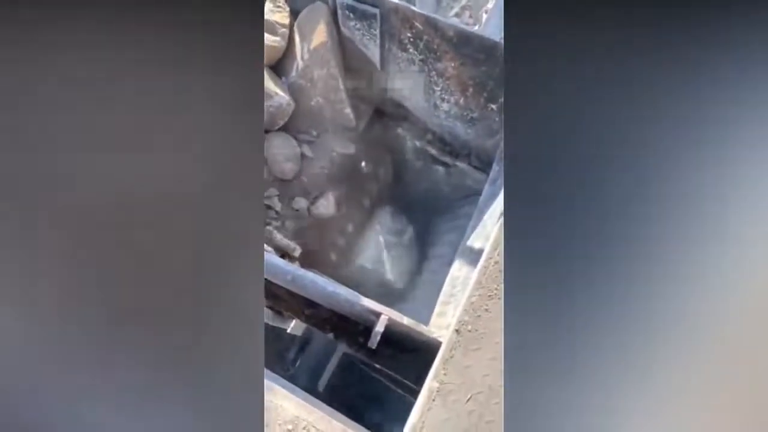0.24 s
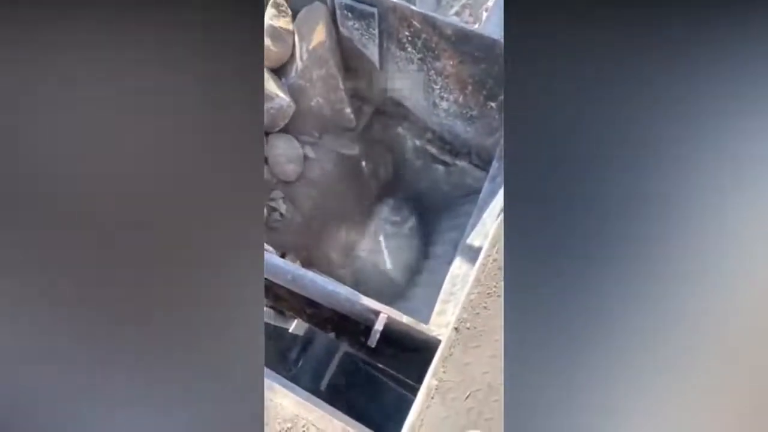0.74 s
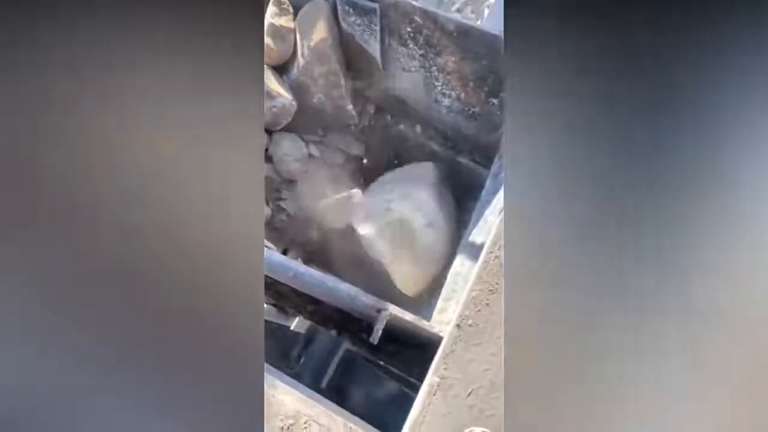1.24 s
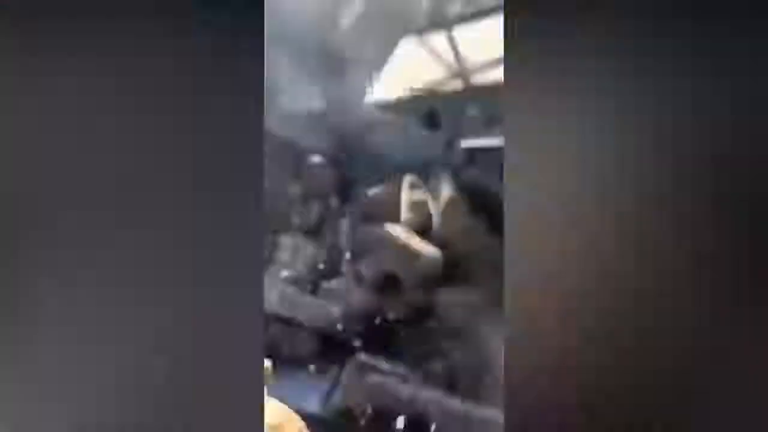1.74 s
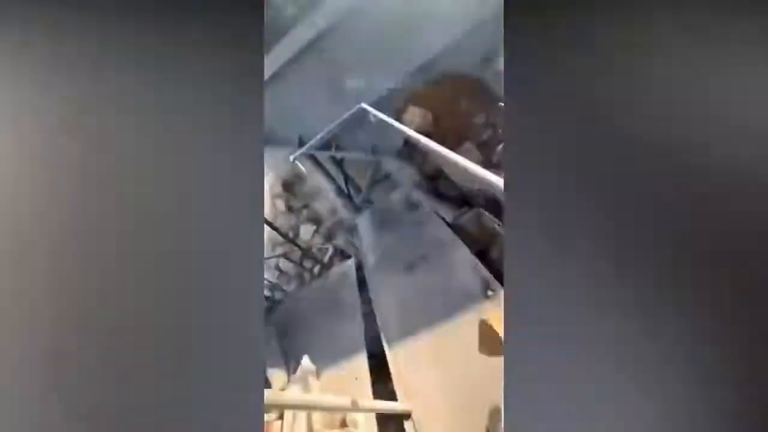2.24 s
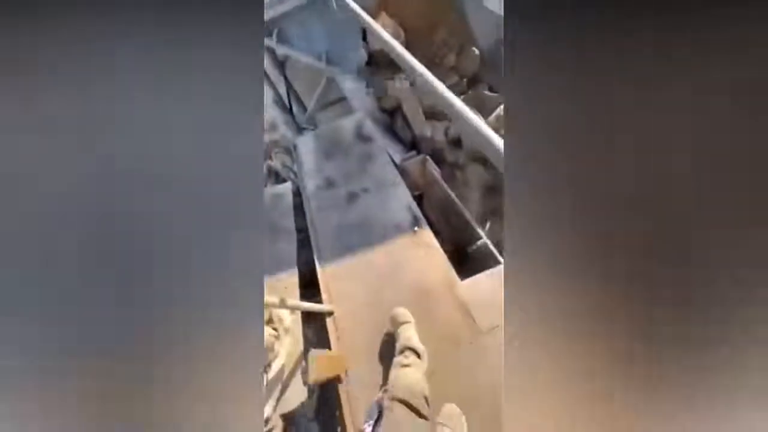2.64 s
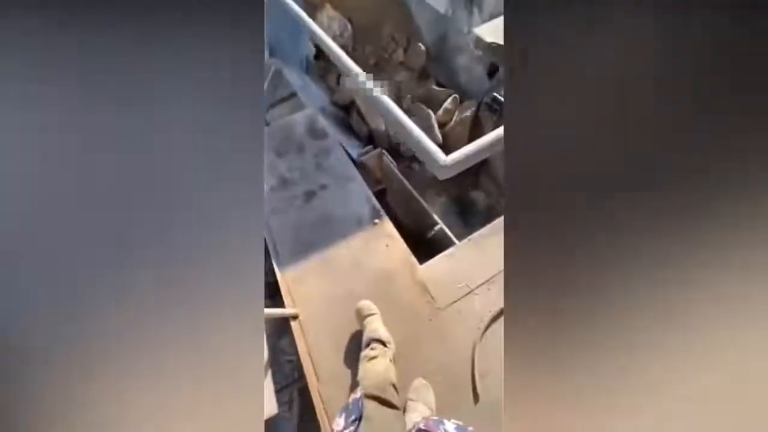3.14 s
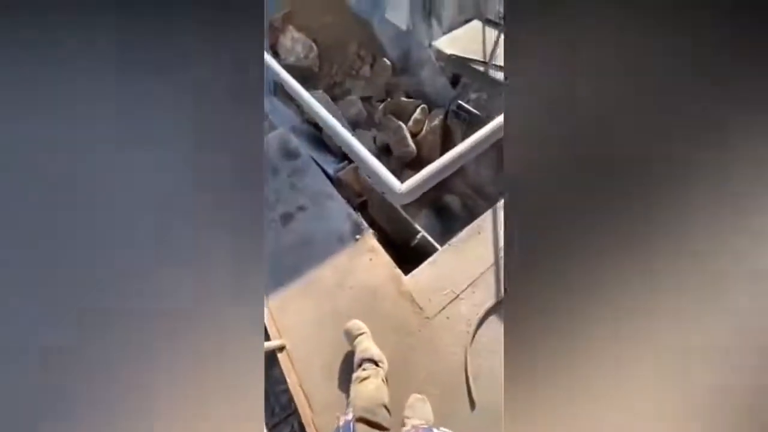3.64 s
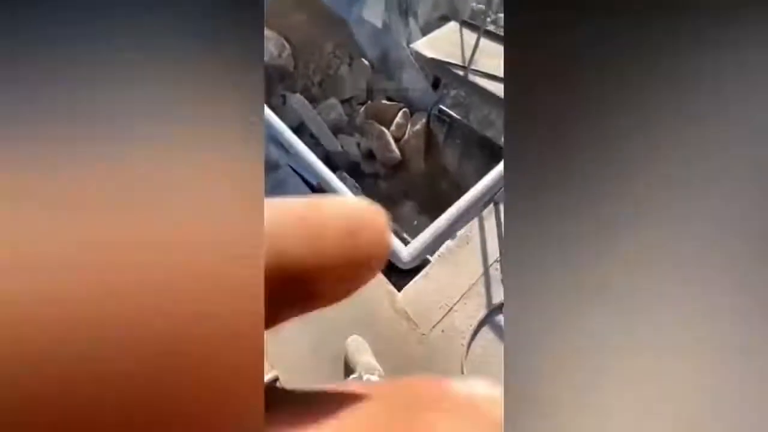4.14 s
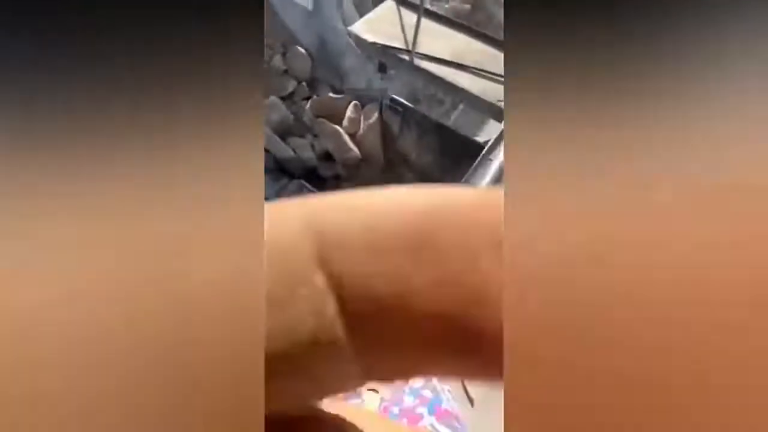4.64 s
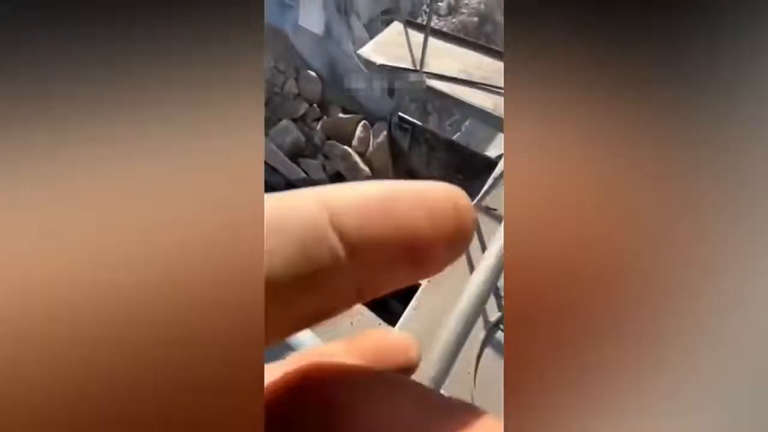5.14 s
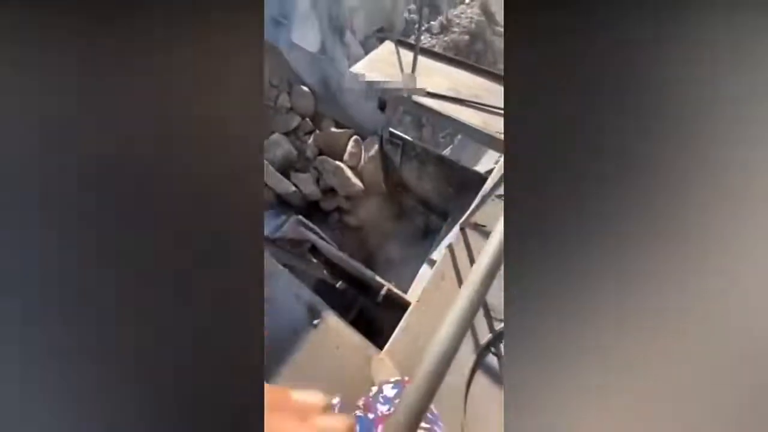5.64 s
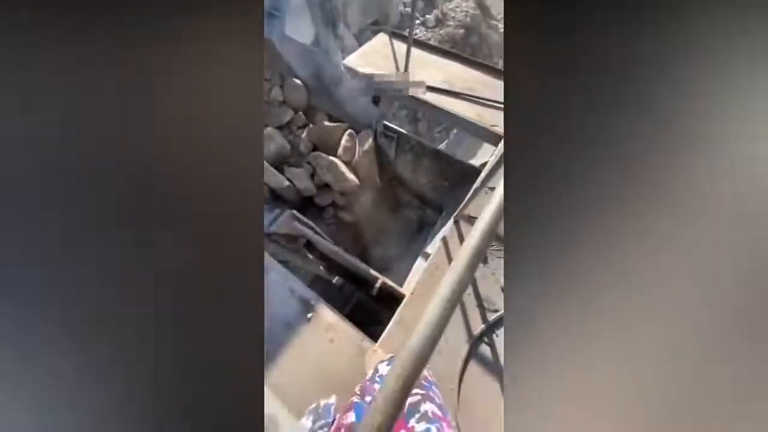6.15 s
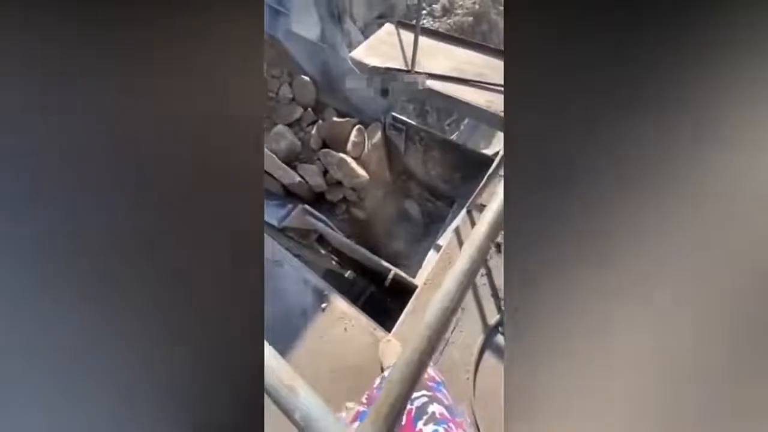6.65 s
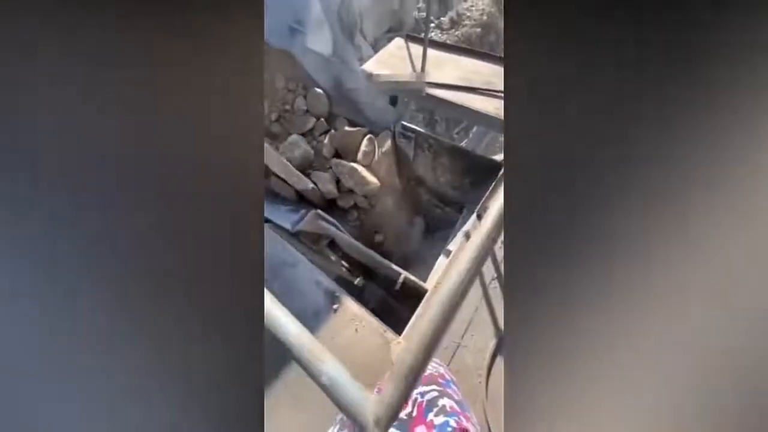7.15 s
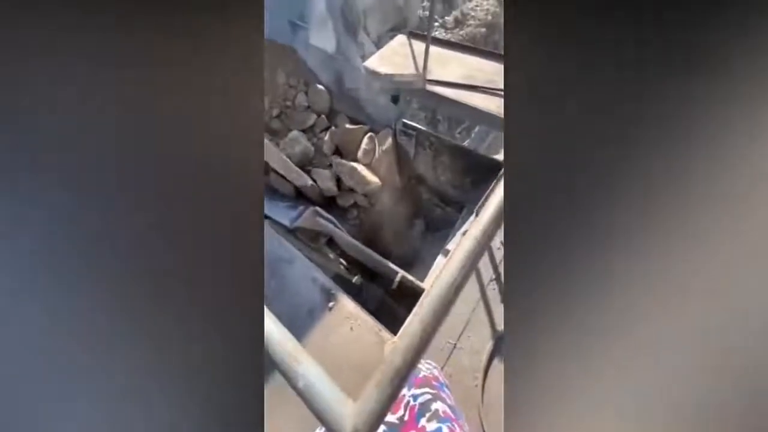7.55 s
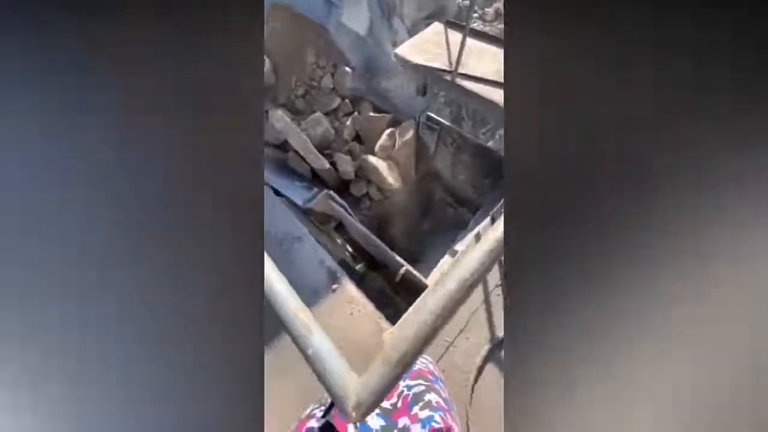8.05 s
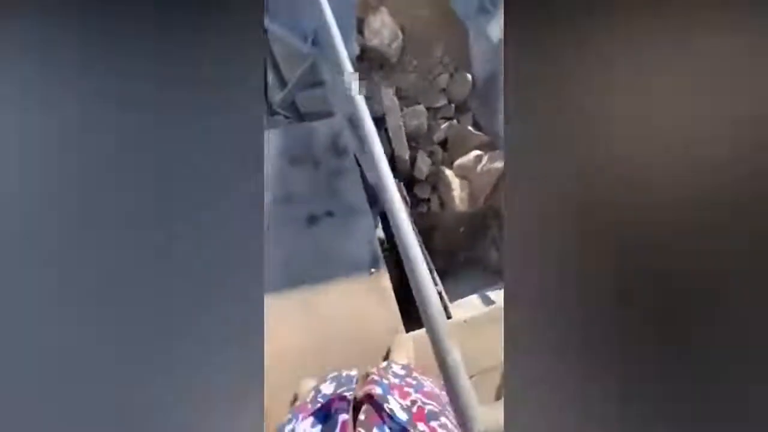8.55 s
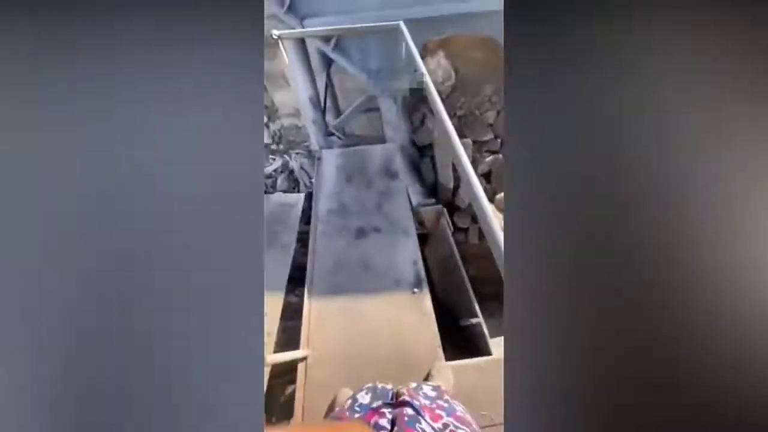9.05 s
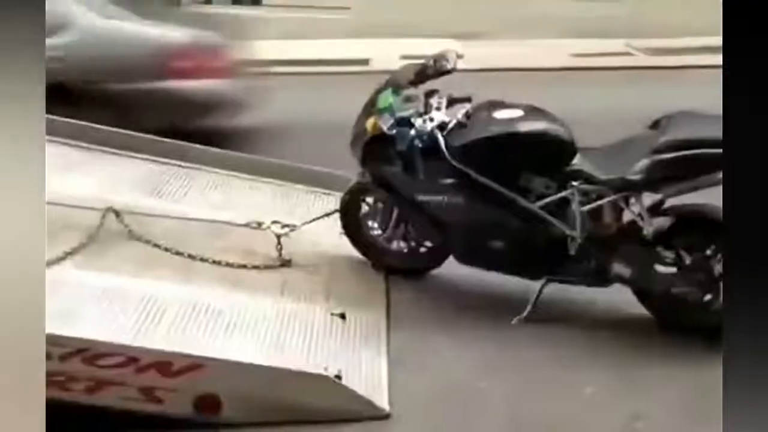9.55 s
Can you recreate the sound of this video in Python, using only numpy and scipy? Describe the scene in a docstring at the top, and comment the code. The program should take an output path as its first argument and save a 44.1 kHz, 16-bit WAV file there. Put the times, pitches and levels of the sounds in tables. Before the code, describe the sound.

A jaw crusher rumbles and grinds in quick pulsing strokes while boulders knock, stones crack and clatter in a steel hopper, slowly fading out.

```python
"""Jaw crusher in a quarry

The jaw bites about four times a second: filtered noise rumbles, grinds and trickles with each stroke.
Damped sines make the boulders' knocks, the frame's booms and the taps of stone on stone.
Stones crack as bursts of coloured noise with clunks and shards, a loose steel bar rings, the drive whines.
Steel walls answer the blows; the sound fades and stops."""
import sys
import numpy as np
from scipy import signal
from scipy.fft import rfft, irfft, next_fast_len
from scipy.io import wavfile
from scipy.ndimage import uniform_filter1d, map_coordinates

SR = 44100
rng = np.random.default_rng(int(sys.argv[2]) if len(sys.argv) > 2 else 0)


def generate_wav(sig):
    """Save sig (samples, or channels by samples) to the path in sys.argv[1] as 16-bit PCM at SR."""
    pcm = np.round(np.clip(np.atleast_2d(sig).T, -1, 1) * 32767).astype(np.int16)
    wavfile.write(sys.argv[1], SR, pcm)


N = 432621  # samples
STOP_S = 9.205  # the sound ends here


def amp(db):
    """Decibel law: the amplitude ratio of a level in dB."""
    return 10 ** (np.asarray(db) / 20)


def unit(x):
    """Normalisation: x at rms 1."""
    return x / np.sqrt(np.mean(x ** 2) + 1e-20)


def along(points, hz):
    """Interpolation of (f/Hz, value) points on a logarithmic frequency axis."""
    f, v = np.transpose(points)
    return np.interp(np.log(hz + 1), np.log(f + 1), v)


def wobble(rate):
    """Slow random modulation: a smooth curve through random knots, rate knots a second."""
    return map_coordinates(rng.standard_normal(int(N * rate / SR) + 4), [np.arange(N) * rate / SR])


def filtered(x, response):
    """Linear filtering: the spectrum of x times a response of frequency."""
    m = next_fast_len(N + SR // 2)
    return irfft(rfft(x, m) * response(np.fft.rfftfreq(m, 1 / SR)), m)[..., :N]


def coloured(x, spectrum):
    """Spectral shaping: x with the colour of (f/Hz, level/dB) points."""
    return filtered(x, lambda hz: amp(along(spectrum, hz)))


def add(track, s, sound):
    """Superposition: mixes a sound into a track at s seconds."""
    part = track[round(s * SR):][:len(sound)]
    part += sound[:len(part)]


def fading(t, t60, attack, hold=1):
    """Damping: a soft rise, then a fall of 60 dB in t60 (20 ms at least); hold over 1 delays the drop."""
    return (1 - np.exp(-t / attack)) * amp(-60 * (t / max(t60, .02)) ** hold)


def grainy(rate, spread_db, life, hiss, ring_db):
    """Granular noise: random contacts of random size over steady noise, with briefly ringing pitches."""
    sizes = (rng.random(N) < rate / SR) * amp(spread_db * np.minimum(rng.exponential(1, N), 2))
    puffs = signal.lfilter([1], [1, -np.exp(-1 / (life * SR))], sizes)
    z = signal.stft(rng.standard_normal(N), nperseg=1024)[2]

    def smooth_field(bins, frames):
        across = uniform_filter1d(rng.standard_normal(z.shape), size=bins, axis=0)
        return unit(uniform_filter1d(across, size=frames, axis=1))

    pitches = smooth_field(2, 3)
    patches = smooth_field(24, 4)  # broad random patches of colour come and go
    ringing = signal.istft(z * amp(ring_db * (pitches + 0.6 * patches)), nperseg=1024)[1][:N]
    return (unit(puffs) + hiss) * ringing


PEBBLE_COUNT = 2200
PEBBLE_HZ, PEBBLE_SPREAD_DB = 1145, 3.5  # middle pitch and its scatter, as a ratio in dB
PEBBLE_CYCLES = 18  # cycles until the ring is 60 dB down
PEBBLE_DB, PEBBLE_SCATTER_DB = 0, 3  # level and its scatter


def pebbles():
    """Impact resonance: loose stones knock at random moments, each a few cycles at its own pitch."""
    when = rng.random(PEBBLE_COUNT)
    pitch_luck, level_luck = np.clip(rng.standard_normal((2, PEBBLE_COUNT, 1)), -2, 2)
    t = np.arange(1024) / SR
    hz = np.clip(PEBBLE_HZ * amp(PEBBLE_SPREAD_DB * pitch_luck), 300, 7000)
    level_db = PEBBLE_DB + PEBBLE_SCATTER_DB * level_luck
    rings = amp(level_db - 60 * t * hz / PEBBLE_CYCLES) * np.sin(2 * np.pi * hz * t)
    rings *= 1 - np.exp(-hz * t)  # rounded stones meet softly
    places = (when * N).astype(int)[:, None] + np.arange(len(t))
    return np.bincount(places.ravel(), rings.ravel())[:N]


# course of the load before the strokes swell it: t/s, rumble level/dB, grinding level/dB, grit level/dB
LOAD_COURSE = [(0.0, -14.5, -18.5, -35), (0.2, -21, -40.5, -44.5), (0.6, -23.5, -28, -40.5),
               (0.85, -20, -33, -45.5), (1.1, -22, -30, -43), (1.35, -19, -29.5, -46),
               (1.6, -21.5, -26, -45), (1.8, -25, -34.5, -46), (2.0, -27, -51, -38.5), (2.3, -23, -34, -52),
               (2.45, -20, -36.5, -30), (2.65, -31.5, -43, -38.5), (2.8, -23, -39.5, -42),
               (2.95, -27, -39.5, -47.5), (3.15, -24, -39, -45.5), (3.6, -22.5, -36.5, -36.5),
               (4.25, -26.5, -37, -50), (4.7, -24.5, -26, -44.5), (5.15, -26, -36.5, -44.5),
               (5.6, -22, -34, -48.5), (6.5, -23.5, -36.5, -44.5), (7.2, -23.5, -34, -41.5),
               (8.0, -22, -37, -45.5), (8.55, -21.5, -30, -38.5), (8.9, -24.5, -32, -49),
               (9.2, -24, -31, -47)]
# resonances of the frame: f/Hz, width/Hz, level/dB
FRAME_MODES = [(59.6, 30, -8.5), (89, 24, 0.5), (132.4, 23, 0.5), (251, 59.5, -2.5), (390, 73, -7.5)]
# spectrum of grinding stone: f/Hz, level/dB
STONE_COLOUR = [(260, -30), (450, 7.5), (557, -2), (840, -3.5), (1190, -9.5), (2480, -13.5), (3200, -27),
                (4160, -45), (7040, -120)]
# spectrum of grit, and of the sharp edge of a crack: f/Hz, level/dB
GRIT_COLOUR = [(1500, -16.5), (2800, -0.5), (4000, 0), (5800, 0), (8500, -5), (10500, -10)]
JAW_HZ, JAW_SHUT_S = 4.175, 5.21  # strokes a second; one moment at which the jaw is shut
RUMBLE_SWELL_DB, GRIND_SWELL_DB, GRIT_SWELL_DB = 2.5, 1, 1.5  # rise as the jaw shuts, fall as it opens


def frame_response(f):
    """Modal superposition: resonances of alternating sign under a steep cut above 520 Hz."""
    modes = 0
    for k, (centre, width, db) in enumerate(FRAME_MODES):
        damping = 1j * f * width
        modes = modes + (-1) ** k * amp(db) * damping / (centre * centre - f * f + damping)
    return modes / (1 + (f / 520) ** 4)


def machine():
    """Periodic modulation: frame rumble, grinding stone and trickling grit swell as the jaw shuts."""
    s, rumble_db, grind_db, grit_db = np.transpose(LOAD_COURSE)
    t = np.arange(N) / SR
    stroke = np.cos(2 * np.pi * JAW_HZ * (t - JAW_SHUT_S))
    shake_db = 1.1 * wobble(20)
    rumble_gain = amp(np.interp(t, s, rumble_db) + RUMBLE_SWELL_DB * stroke)
    grind_gain = amp(np.interp(t, s, grind_db) + GRIND_SWELL_DB * stroke + shake_db)
    grit_gain = amp(np.interp(t, s, grit_db) + GRIT_SWELL_DB * stroke + shake_db + 0.6 * wobble(7.4))
    shocks = grainy(rate=90, spread_db=0.5, life=0.026, hiss=3.2, ring_db=2.2)
    rumble = unit(filtered(shocks, frame_response))
    # the same contacts make grinding and grit
    contacts = grainy(rate=410, spread_db=6.5, life=0.007, hiss=7.4, ring_db=4.5)
    grind = 0.93 * unit(coloured(contacts, STONE_COLOUR)) + np.pad(pebbles(), (0, N))[:N]
    grit = unit(coloured(contacts, GRIT_COLOUR))
    return rumble_gain * rumble + grind_gain * grind + grit_gain * grit


SAG, SAG_S = 0.13, 0.016  # a heavy blow starts this share sharp; time constant of the settling


def thuds(table, attack, rattle, hold):
    """Damped oscillation: each heavy blow is one low swing with a rattle of nearby plate tones."""
    out, t = np.zeros(N), np.arange(SR // 3) / SR
    nearby = rng.uniform(0.6485, 1.45, (len(table), 3))
    for (s, db, hz, t60), near in zip(table, nearby):
        sagging_t = t + SAG * SAG_S * (1 - np.exp(-t / SAG_S))
        swing = np.sin(2 * np.pi * hz * sagging_t)
        plates = np.sin(2 * np.pi * hz * near[:, None] * t).sum(0)
        add(out, s - .004, amp(db) * fading(t, t60, attack, hold) * (swing + rattle * plates))
    return out


# boulders on the hopper plates: t/s, level/dB, f/Hz
BOULDER_KNOCKS = [(0.041, -23.5, 190), (0.193, -6, 250), (0.389, -18, 223), (0.411, -2, 313),
                  (0.426, 3.5, 268), (0.441, -11, 251), (0.792, -9.5, 272), (1.165, -12, 185),
                  (1.383, 2.5, 300), (1.405, -9, 193), (1.495, -13.5, 252), (1.626, -13, 235),
                  (1.867, -1, 266), (1.902, -6, 315.6), (2.086, -10, 294), (2.296, -20.5, 279),
                  (2.343, -8.5, 200.5), (2.453, -14, 288), (2.51, -15, 233.4), (2.752, -13, 264),
                  (2.991, -20, 260), (3.011, -12, 250), (3.082, -8.5, 290), (3.098, -4, 252),
                  (3.324, -14, 280), (3.5, -3.5, 250), (3.553, -9.5, 282), (3.727, -5, 253),
                  (3.787, -11, 275), (3.991, -1, 258), (4.231, -19.5, 294), (4.287, -9, 212),
                  (4.546, -11, 259.5), (4.698, -3, 282.5), (4.714, -12, 291), (4.74, -18.5, 268),
                  (4.954, -22, 296.5), (5.031, -18, 259), (5.206, -14.5, 326), (5.395, -10.5, 285),
                  (5.623, -12.5, 295), (5.659, -5.5, 263), (5.832, -27, 331), (6.019, -17.5, 283),
                  (6.143, -8, 331), (6.381, -10, 310), (6.432, -8.5, 282), (6.511, -21, 315),
                  (6.59, -13, 254), (6.695, -14, 303), (6.815, -9.5, 293), (7.247, -11, 309),
                  (7.987, -7.5, 273), (8.235, -8, 257), (8.307, -11, 252), (8.54, -16, 321),
                  (8.74, -13, 279.5), (8.991, -17, 261)]
KNOCK_T60, KNOCK_DB = 0.09, -9  # t60/s of a blow at this level/dB
DAMPING_DB = 0.5  # dB that the t60 shortens per dB of blow


def knocks():
    """Level-dependent damping: boulders knock on plates, and harder knocks die sooner."""
    table = [(s, db, hz, KNOCK_T60 * amp(-DAMPING_DB * (db - KNOCK_DB))) for s, db, hz in BOULDER_KNOCKS]
    return thuds(table, attack=0.0057, rattle=0.5, hold=1.202)


CHIP_COUNT = 35
CHIP_DB, CHIP_BITE_DB, CHIP_SHARP_DB = -26.5, -8, -22.5  # middle levels, as in the table of cracks
CHIP_T60, CHIP_HZ = 0.19, 776.5  # decay scale in s, middle clunk pitch
CHIP_SCATTER_S, CHIP_SCATTER_DB = 0.084, 4


def chips():
    """Clustered random events: rows of small breaks, scattered around random strokes of the jaw."""
    luck = rng.standard_normal((CHIP_COUNT, 5))
    strokes = np.round(JAW_HZ * (STOP_S * rng.random(CHIP_COUNT) - JAW_SHUT_S))
    times = JAW_SHUT_S + strokes / JAW_HZ + CHIP_SCATTER_S * luck[:, 0]
    rows = []
    for s, (a, b, c, d) in zip(np.clip(times, .01, STOP_S), luck[:, 1:]):
        db = CHIP_DB + CHIP_SCATTER_DB * a
        bite_db = CHIP_BITE_DB + CHIP_SCATTER_DB * b
        sharp_db = CHIP_SHARP_DB + CHIP_SCATTER_DB * c
        rows.append((s, db, bite_db, sharp_db, CHIP_T60, CHIP_HZ * amp(2 * d)))
    return rows


# breaking stones: t/s, level/dB, bite level/dB, sharpness level/dB, decay scale/s, clunk f/Hz
STONE_BREAKS = [(0.137, -11.5, -11, -20, 0.2, 535), (0.188, -4, -15, -13, 0.19, 534),
                (0.228, -28, -18, 3, 0.16, 694), (0.382, -12.5, -5, -15, 0.23, 702),
                (0.412, -4, -16, -13, 0.2, 541), (0.559, -18, -6, -4, 0.089, 870),
                (0.698, -11.5, -11, -33, 0.07, 920), (0.73, -29, -15, 16.5, 0.11, 526),
                (0.778, -27, -17.5, -21, 0.098, 568), (0.805, -15, -14, -29, 0.24, 745),
                (1.132, -22.5, -7, -17.5, 0.35, 840), (1.165, -4, -11.5, -4, 0.12, 502),
                (1.25, -9.5, -13, -15.5, 0.18, 546), (1.341, -15, -17, -34, 0.13, 874),
                (1.382, -11, -10, -7.5, 0.17, 543), (1.494, -15, -34, -14.5, 0.14, 990),
                (1.52, -13, -19, -28, 0.22, 1060), (1.598, -17.5, -11, -11.5, 0.36, 788),
                (1.676, -14, -29, -18, 0.19, 558), (1.862, 1.7, -8.5, -9.5, 0.095, 692),
                (1.907, -10.5, -5.5, -9.5, 0.24, 684), (2.058, -28, -3, -24, 0.18, 1140),
                (2.091, -17.5, -8, -8, 0.2, 1032), (2.207, -24, -7, -27.5, 0.1, 1120),
                (2.291, -24, -5, -24, 0.23, 970), (2.397, -19.5, 3.5, 8.5, 0.099, 1990),
                (2.415, -19.5, -5, 11, 0.22, 1495), (2.512, -21, 4, 9, 0.12, 1590),
                (2.53, -24, -2.5, 8, 0.12, 1105), (2.63, -28.5, 0, 6.5, 0.18, 1470),
                (2.75, -19, -3.5, -10, 0.13, 960), (2.985, -21.5, -9, -6, 0.49, 1035),
                (3.085, -6, -6.5, -4, 0.098, 740), (3.143, -12.5, -16, -17.5, 0.23, 1064),
                (3.293, -23.5, -15, -7.5, 0.26, 794), (3.347, -14, -18, -19, 0.15, 764),
                (3.469, -21, -11, -17, 0.13, 885), (3.496, -6, -9.5, -8.5, 0.13, 740),
                (3.55, -15, -4, -13.5, 0.17, 797), (3.585, -21, -12, 2, 0.084, 750),
                (3.725, -24, -10, -15, 0.18, 710), (3.743, -7.5, -9.5, -13, 0.26, 689),
                (3.983, -9.5, -9.5, -6, 0.21, 730), (4.078, -20, -16, -14, 0.44, 758),
                (4.17, -17, -22, -7, 0.062, 1405), (4.222, -16, -3.5, -11, 0.16, 1145),
                (4.285, -10.5, -12.5, -17.5, 0.1, 837), (4.425, -19.5, -7, -14, 0.27, 770),
                (4.457, -19, -4, -2, 0.044, 780), (4.486, -17, -18, -2.5, 0.04, 760),
                (4.522, -8.5, -19, -8.5, 0.12, 696), (4.631, -21, -8.5, -23, 0.36, 1372),
                (4.694, -8, -7.5, -9.5, 0.26, 807), (4.87, -25, -0.5, -15.5, 0.46, 873),
                (4.935, -22.5, -13, 3, 0.13, 1050), (4.997, -16.5, -3.5, -35, 0.36, 1067),
                (5.132, -20, -1.5, -31, 0.3, 1287), (5.2, -15.5, -1, -7, 0.15, 950),
                (5.256, -12, -7, -35, 0.056, 765), (5.316, -16, -10, -42, 0.11, 883),
                (5.355, -12.5, -4.5, -34, 0.12, 859), (5.416, -18, -1, -27.5, 0.21, 715),
                (5.445, -11.5, -9.5, -15.5, 0.075, 822), (5.465, -16.5, -9, 2.5, 0.084, 1850),
                (5.609, -12.5, -4.5, -18, 0.19, 754), (5.662, -10, -10, -18, 0.11, 753),
                (5.69, -14, -4, -16, 0.11, 774), (5.916, -12, -9.5, -4.5, 0.19, 873),
                (6.011, -18.5, -18, -14, 0.17, 783), (6.121, -14, -8, -11.5, 0.13, 814),
                (6.145, -9.5, -20, -21, 0.067, 706), (6.314, -18, -3.5, -36, 0.45, 836),
                (6.35, -20, -11, -20, .15, 810), (6.38, -9, -9, -35.5, 0.097, 820),
                (6.42, -12, -10, -3.5, 0.23, 1000), (6.512, -17, -6, -10, 0.18, 800),
                (6.607, -10.5, 2, -20, 0.19, 1324), (6.692, -14, -27, -17, 0.12, 764),
                (6.817, -6.5, -10.5, -16, 0.13, 623), (6.881, -20, -4, -3, 0.13, 629.7),
                (7.19, -18, -6.5, -13, 0.13, 740), (7.243, -17, -8.5, -15, 0.15, 1085),
                (7.547, -10.5, -4.5, -21, 0.2, 535), (7.753, -17, -3, -5, 0.19, 2330),
                (7.822, -14.5, -7, -6.5, 0.094, 604), (7.965, -16, -8, -6, 0.05, 1410),
                (8.0, -16, -4, -4.5, 0.19, 760), (8.035, -11.5, -7, -8, 0.052, 880),
                (8.071, -12.5, -1.5, 2.5, 0.094, 810), (8.301, -11, -13, -4, 0.12, 745),
                (8.24, -19.5, -6, -5, 0.31, 696), (8.49, -25, -4, 1.5, 0.35, 746),
                (8.565, -21, 3, 3, 0.11, 700), (8.73, -14.5, -9, -15, 0.24, 626),
                (8.828, -24, 7, -10, 0.026, 790), (8.93, -16.5, -10, -10, 0.24, 720),
                (8.985, -18.5, 1, 0, 0.31, 698), (9.17, -15, 0.5, -11, 0.17, 723)]
# soft body of a crack: f/Hz, level/dB
BODY_COLOUR = [(300, -7.5), (480, 0), (750, 3.5), (1000, -2), (1800, -36)]
# hard middle of a crack: f/Hz, level/dB
BITE_COLOUR = [(600, -33), (1100, -2), (1500, 1.5), (2100, -2.5), (2700, -7.5), (4000, -33)]
STRAIN_S, STRAIN_DB = 0.0063, -11  # crunch before a break: growth time, level relative to the break
SHARDS, SHARD_DB = 5, -5.5  # fragments after each break, their relative level
SHARD_S = .05  # mean delay of a fragment at a decay scale of 0.15 s


def cracks():
    """Brittle fracture: stones strain, crumble as three bands of noise, clunk and shed fragments."""
    (body, bite, edge, clunk), t = np.zeros((4, N)), np.arange(SR // 3) / SR
    stones = STONE_BREAKS + chips()
    crumble = grainy(rate=600, spread_db=2.5, life=0.003, hiss=2.2, ring_db=3.5)
    nearby = rng.uniform(.6, 1.6, (len(stones), 4))
    for (s, db, bite_db, sharp_db, t60, hz), near in zip(stones, nearby):
        # the crunch grows louder and louder up to the break
        strain = amp(db + STRAIN_DB) * np.exp(-t[SR // 10::-1] / STRAIN_S)
        for layer, part_db in [(body, -9.4), (bite, bite_db - 2.0), (edge, sharp_db - 4.0)]:
            add(layer, max(s - len(strain) / SR, 0), amp(part_db) * strain)

        body_fall = fading(t, t60, attack=0.013)
        bite_fall = fading(t, 0.87 * t60, attack=0.0055, hold=1.41)
        edge_fall = fading(t, 0.67 * t60, attack=0.07 * t60, hold=1.54)
        add(body, s - .006, amp(db - 10.0) * body_fall)
        add(bite, s - .002, amp(db + bite_db - 8.5) * bite_fall)
        add(edge, s - .004, amp(db + sharp_db - 6.0) * edge_fall)

        tones = np.sin(2 * np.pi * hz * t) + 0.4 * np.sin(2 * np.pi * hz * near[:, None] * t).sum(0)
        add(clunk, s - .003, amp(db - 7.5) * fading(t, 0.55 * t60, attack=0.0026) * tones)

        short_t = t[:2048]
        for wait, size, small in rng.exponential(1, (SHARDS, 3)):
            shard_hz = hz * (1 + 0.49 * small)
            shard = fading(short_t, 0.038, attack=0.00099) * np.sin(2 * np.pi * shard_hz * short_t)
            shard_db = db + SHARD_DB - 6 * (wait + size + small)
            add(clunk, s + SHARD_S * wait * t60 / .15, amp(shard_db) * shard)
    bands = [(body, BODY_COLOUR), (bite, BITE_COLOUR), (edge, GRIT_COLOUR)]
    return sum(shape * unit(coloured(crumble, colour)) for shape, colour in bands) + clunk


# shocks of the frame: t/s, level/dB, f/Hz, t60/s
FRAME_BOOMS = [(0.154, -15.5, 129.3, 0.27), (0.27, -12, 131, .2), (0.325, -10.5, 122, .2),
               (0.401, -5, 105, .15), (0.55, -14, 123, 0.29), (0.765, -9, 103.4, .18),
               (0.91, -13, 125, 0.17), (0.988, -19.5, 74.3, .25), (1.083, -12.5, 87.8, .2),
               (1.161, -4.5, 151, 0.14), (1.238, -10.5, 111.1, 0.16), (1.394, -7, 135, .17),
               (1.643, -1.5, 99.6, .08), (1.702, 6, 93, 0.062), (1.872, -12, 122.5, 0.099),
               (1.918, -7.5, 120.5, .12), (2.09, -10, 107, 0.23), (2.338, -9.5, 122.8, .2),
               (2.394, -10.5, 130.8, 0.19), (2.778, -23, 136, .3), (3.088, -2.5, 90.1, .14),
               (3.399, -13.5, 128.3, 0.24), (3.504, -12.5, 85, .2), (3.77, -8, 96, .18),
               (3.849, -23, 78.7, .3), (3.991, -6.5, 95.7, 0.19), (4.03, -10.5, 110, 0.23),
               (4.3, -17, 130.5, 0.19), (4.523, -14, 106.6, .25), (4.726, -5.5, 108, .15),
               (4.942, -10, 92.3, .2), (5.269, -13, 123, 0.27), (5.613, -18, 136, 0.33),
               (5.913, -17, 108.6, 0.32), (6.137, -14, 129.4, 0.25), (6.403, -13.5, 108, .2),
               (6.443, -12, 141, 0.24), (6.654, -18, 123, .25), (6.821, -15.5, 113, .25),
               (7.059, -13, 117, 0.28), (7.176, -13, 119, .2), (7.273, -16.5, 112.6, 0.17),
               (7.42, -6, 113, 0.13), (7.55, -21.5, 121.4, .25), (7.77, -24, 113, .3),
               (8.045, -7.5, 100.7, 0.18)]


def booms():
    """Impulsive excitation: shocks set the heavy frame swinging at low pitches."""
    return thuds(FRAME_BOOMS, attack=0.009, rattle=0.22, hold=1.22)


# short hard knocks of one stone on another: t/s, level/dB, f/Hz, t60/s (20 ms at least)
STONE_TAPS = [(0.584, -15.5, 2394, 0.053), (1.051, -26, 790, 0.056), (1.158, -11.5, 1197, .02),
              (1.167, -6, 1940, 0.035), (1.367, -17.5, 2460, 0.033), (1.382, -5, 400, 0.057),
              (1.599, -15.5, 781, .05), (1.676, 5.5, 304, .05), (1.677, -15, 1505, .02),
              (1.859, -4, 1130, 0.037), (1.874, -3, 421, 0.038), (1.862, 1.5, 617, 0.047),
              (1.907, -2.5, 737, 0.041), (1.925, -4, 480, 0.039), (2.209, -17, 1050, 0.063),
              (3.082, -8, 743, 0.062), (3.498, -2.5, 852, 0.056), (3.743, -7, 680, 0.036),
              (3.985, -7.5, 1380, 0.025), (4.171, -6, 1430, 0.018), (4.425, -17, 1630, 0.025),
              (4.457, -24, 4500, 0.019), (4.488, -15.5, 5140, 0.018), (4.521, -11.5, 2400, 0.023),
              (4.545, -7, 740, 0.075), (4.574, -13, 1500, .04), (4.63, -13, 1344, .07),
              (4.845, -13, 1230, 0.037), (4.997, -15, 1510, .03), (5.014, -7, 1055, 0.061),
              (5.034, -12, 1090, 0.033), (5.148, -14, 1250, 0.083), (5.2, -10, 2460, 0.033),
              (5.261, -11, 853, 0.059), (5.316, -12.5, 858, 0.072), (5.355, -16, 870, 0.045),
              (5.374, -7.5, 840, 0.037), (5.417, -13.5, 710, .05), (5.468, -6, 1940, 0.031),
              (5.61, -20, 1110, 0.027), (5.7, -14, 1995, 0.064), (6.381, -4, 770, 0.031),
              (6.421, -7.5, 2440, 0.056), (6.607, -3.5, 1335, .13), (6.615, -12, 1770, 0.14),
              (6.632, -11, 2025, 0.082), (7.752, -19, 2390, 0.035), (7.873, -16, 1800, .04),
              (7.904, -20, 2220, .04), (7.966, -15.5, 2360, .03), (8.081, -16, 1160, .04),
              (8.495, -15, 2200, .04), (8.712, -14, 2060, 0.035), (8.758, -14, 910, .04),
              (8.804, -10, 1670, .025), (8.828, -12, 2300, .025), (8.917, -13, 2660, 0.033),
              (8.938, -17, 2220, .04), (8.985, -9.5, 1420, .03)]
TAP_CLICK_DB = -13.5  # level of the click at contact
CLICK_REACH = 3.5  # the click is dull above this multiple of the stone's pitch


def taps():
    """Contact and resonance: a click and a brief ring at the stone's pitch; big stones click dully."""
    out, t = np.zeros(N), np.arange(SR // 10) / SR
    for s, db, hz, t60 in STONE_TAPS:
        ring = fading(t, t60, attack=.001) * np.sin(2 * np.pi * hz * t)
        dull = signal.butter(2, min(CLICK_REACH * hz, SR / 3), fs=SR)
        noise = unit(signal.lfilter(*dull, rng.standard_normal(len(t))))
        click = amp(TAP_CLICK_DB) * fading(t, 0.021, attack=.0005) * noise
        add(out, s - .001, amp(db - 7) * (ring + click))
    return out


# stones strike the bar: t/s, level/dB
BAR_STRIKES = [(1.16, 3), (1.86, -18.5), (2.398, -9), (2.5122, -9), (5.465, -17.5), (6.4223, -19)]
# tones of the steel bar: f/Hz, level/dB, t60/s
BAR_MODES = [(1940, -2.5, 0.1), (4270, -20.5, .12), (4870, -19.5, 0.066), (4740, -11.5, .15),
             (5330, -9.5, .12), (5800, 0, 0.08), (5850, 6, 0.11), (6270, 0.5, 0.08), (8900, -13, 0.36)]
BAR_RATTLE = 0.87  # depth of the loose bar's buzz, less for tones that ring long


def bar():
    """Modal vibration: strikes ring the loose bar at new strengths, each tone with its own buzz."""
    out, t = np.zeros(N), np.arange(SR // 2) / SR
    buzzes = [1 + BAR_RATTLE * wobble(220) / (1 + 8 * t60) for hz, level, t60 in BAR_MODES]
    strengths = rng.normal(0, 1.7, (len(BAR_STRIKES), len(BAR_MODES)))  # dB
    for (s, db), luck in zip(BAR_STRIKES, strengths):
        ring = 0
        for (hz, level, t60), luck_db, buzz in zip(BAR_MODES, luck, buzzes):
            envelope = amp(level + luck_db) * fading(t, t60, attack=0.004)
            ring = ring + envelope * buzz[round(s * SR):][:len(t)] * np.sin(2 * np.pi * hz * t)
        add(out, s, amp(db - 22.5) * ring)
    return out


# reverberation of the yard: f/Hz, t60/s
YARD_DECAY = [(200, 0.28), (1000, 0.3), (8000, 0.18)]


def yard(x, size=8192):
    """Reverberation: steel walls answer; each short stretch gets a fresh tail, so no one colour dominates."""
    parts = np.pad(x, (0, -N % size)).reshape(-1, size)
    hz, t, z = signal.stft(rng.standard_normal((len(parts), 2 * size)), SR, nperseg=256)
    decay = amp(-60 * t / along(YARD_DECAY, hz)[:, None])  # each frequency dies at its own speed
    tails = signal.istft(z * decay, SR, nperseg=256)[1]
    tails = tails / np.linalg.norm(tails, axis=1, keepdims=True)
    out = np.zeros(N)
    for k, answer in enumerate(signal.fftconvolve(parts, tails, axes=1)):
        add(out, k * size / SR, answer)
    return out


# faint chirps of the whine: t/s, length/s, level/dB
WHINE_CHIRPS = [(3.837, 0.096, -46), (3.938, 0.19, -43), (6.05, 0.066, -40), (6.11, 0.14, -38.5),
                (6.402, 0.24, -49), (6.723, 0.065, -36), (6.812, 0.052, -31), (6.9, 0.058, -39),
                (6.973, 0.048, -32), (7.072, .12, -41), (7.18, 0.097, -42), (7.31, 0.057, -42),
                (7.406, 0.067, -44), (7.55, 0.074, -38), (8.614, 0.097, -42)]
WHINE_HZ, WHINE_FLICKER_DB = 2406, 2


def whine():
    """Narrow-band tone: a thin broken sound from the drive, an unsteady sine inside narrow noise."""
    t = np.arange(N) / SR
    level = 0
    for s, length, db in WHINE_CHIRPS:
        level = level + amp(db) * np.clip(np.minimum(t - s, s + length - t) / 0.021, 0, 1)
    fuzz = unit(filtered(rng.standard_normal(N), lambda f: 1 / (1 + ((f - WHINE_HZ) / 22) ** 2)))
    sine = np.sin(2 * np.pi * np.cumsum(WHINE_HZ + 6 * wobble(27)) / SR)
    return level * amp(WHINE_FLICKER_DB * wobble(30)) * (0.94 * sine + 0.45 * fuzz)


def scene():
    """Superposition of the machine, the blows, their echo, the booms and the whine."""
    blows = knocks() + cracks() + taps() + bar()
    echo = amp(-6) * yard(blows)
    return (machine() + blows + echo + booms() + whine())[None]


# drift of the top treble: t/s, level/dB
TREBLE_DRIFT = [(0, -2), (0.7, -0.5), (1.3, 0.5), (1.75, -6.5), (2.3, -0.5), (3.2, -2.5), (4.2, 1.5),
                (5.3, 3), (6.3, 3.5), (6.8, -3), (7.7, -0.5), (8.5, 3.5), (9.2, 4.5)]
# colour of the microphone: f/Hz, level/dB
MICROPHONE_COLOUR = [(20, -2), (70, 0.5), (6300, -1.5), (6900, -13), (7300, -28.5), (7700, -7),
                     (8100, -3.5), (9000, -6), (10500, -26)]
TREBLE_HZ, TREBLE_FLICKER_DB = 7300, 2  # where the top treble begins; its random flicker
CEILING = .92  # amplitude at which the overload bends
FADE_START_S, FADE_END_S = 6.15, 9.28  # straight slide of the level from full to nothing
TOP_HZ = 10600  # band limit


def record(dry):
    """Transmission chain: unsteady treble, microphone colour, soft overload, fade, stop, band limit."""
    t = np.arange(N) / SR
    treble = filtered(dry, lambda hz: 1 / (1 + (TREBLE_HZ / (hz + 1)) ** 30))
    treble_db = np.interp(t, *np.transpose(TREBLE_DRIFT)) + TREBLE_FLICKER_DB * wobble(14)
    x = coloured(dry + (amp(treble_db) - 1) * treble, MICROPHONE_COLOUR)
    x = x / (1 + np.abs(x / CEILING) ** 6) ** (1 / 6)
    fade = np.interp(t, (FADE_START_S, FADE_END_S), [1, 0])
    stop = np.clip((STOP_S - t) / 0.0017, 0, 1)
    return filtered(x * fade * stop, lambda hz: 1 / (1 + (hz / TOP_HZ) ** 160))


dry = scene()
out = record(dry)
generate_wav(out)
```